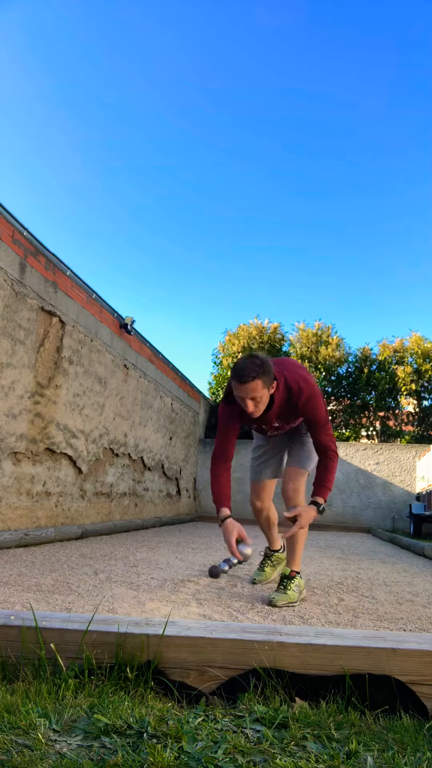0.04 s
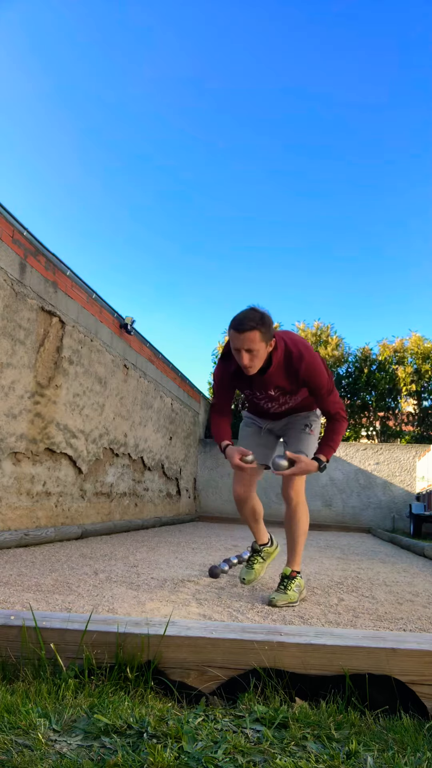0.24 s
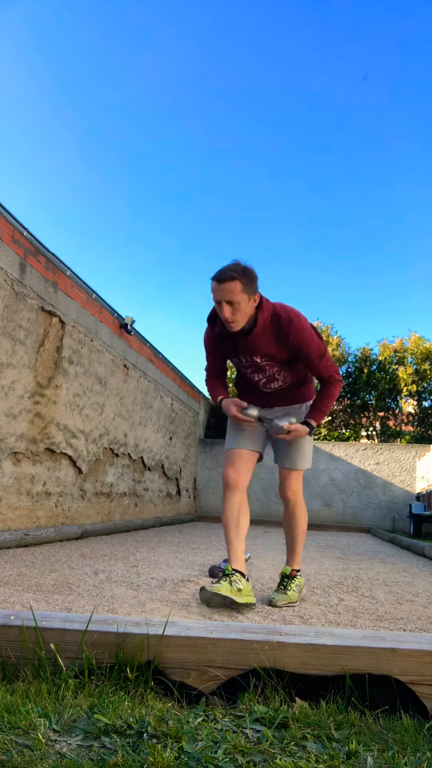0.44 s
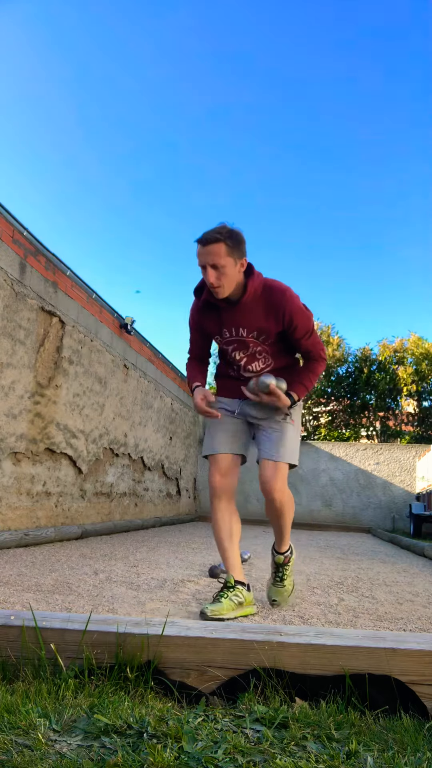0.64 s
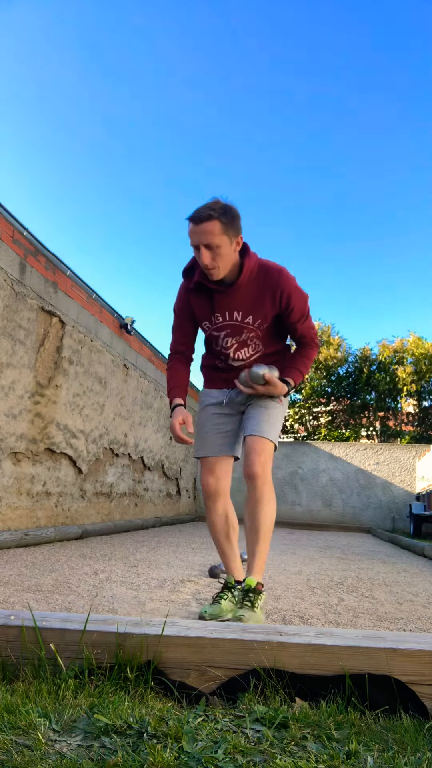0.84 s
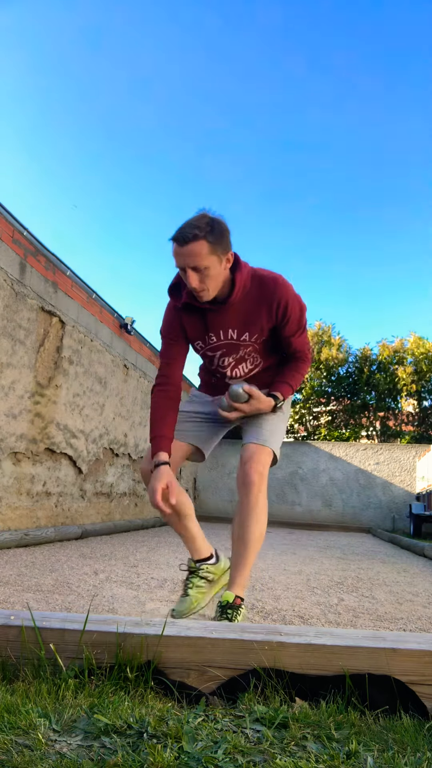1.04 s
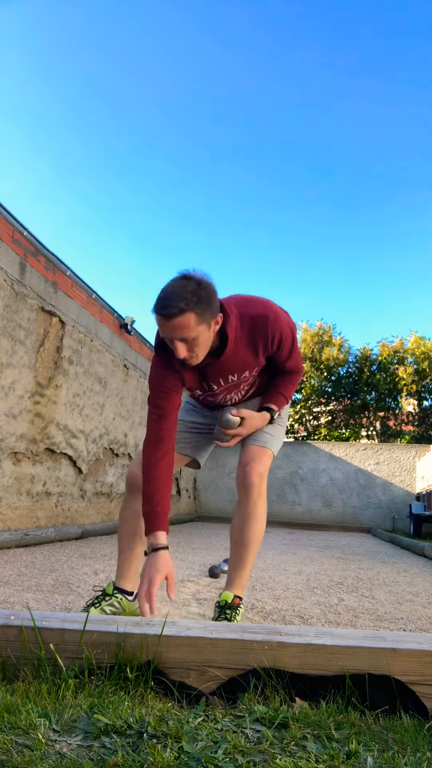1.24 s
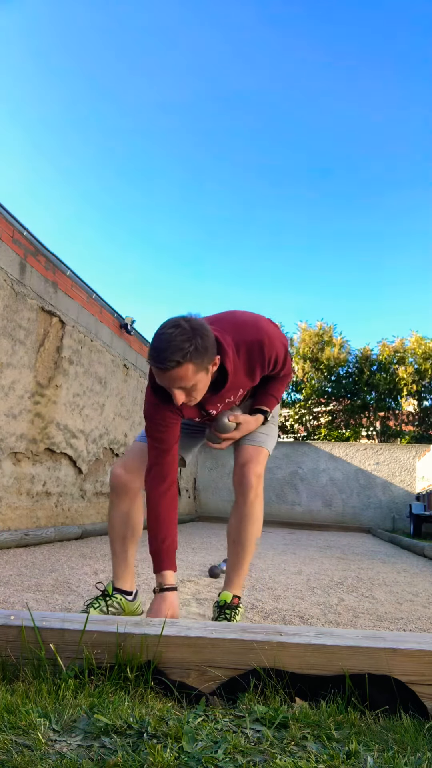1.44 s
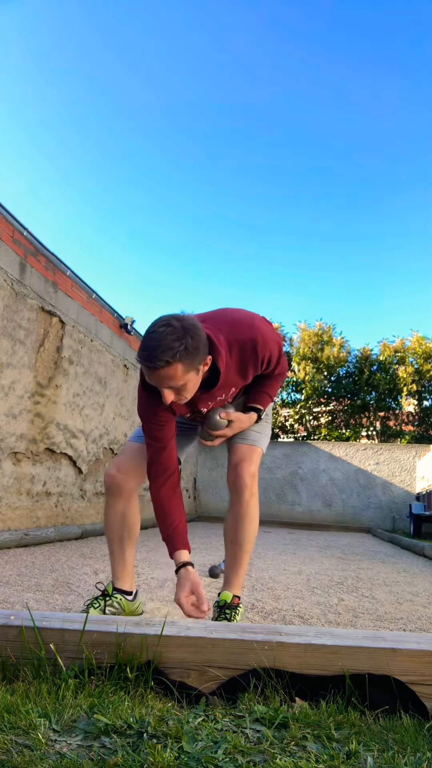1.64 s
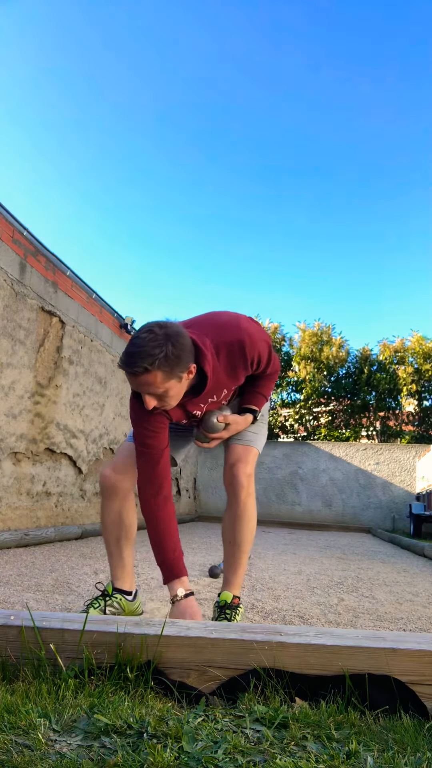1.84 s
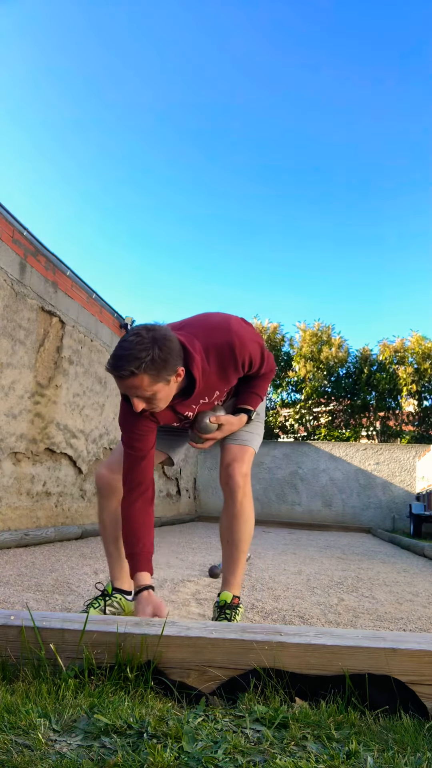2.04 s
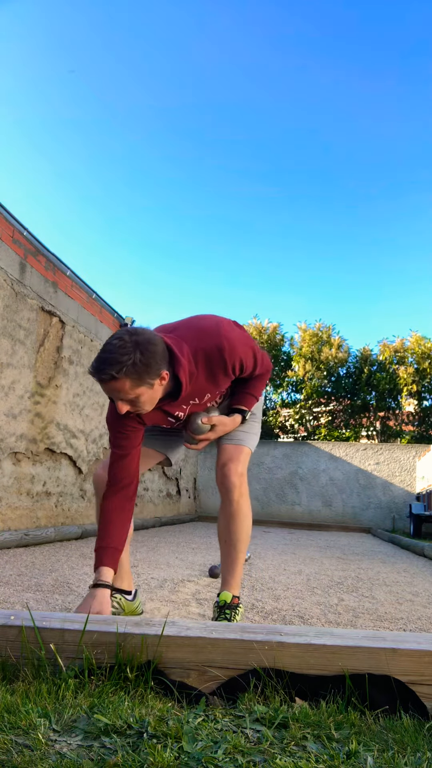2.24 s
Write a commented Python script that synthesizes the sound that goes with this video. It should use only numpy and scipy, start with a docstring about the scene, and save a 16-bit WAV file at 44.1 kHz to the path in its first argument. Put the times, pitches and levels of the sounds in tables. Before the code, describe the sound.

Solid steel balls clack together: one sharp hit, a small fading rattle, then a louder quickening run and a last soft one. Shoes crunch gravel between them; close microphone, walled outdoor court, light wind.

```python
"""Light wind rumbles over a quiet garden: coloured noise, with short band-passed bumps on the microphone.
Shoes and a hand crunch the gravel of a walled court: dense random clicks in three colours, swelling and dying.
From 0.23 s a player gathers steel boules: each clack rings a hollow and a shell, and the walls throw it back.
Larger stones knock from 0.49 s as short damped resonances; one thin noise tick falls at 1.05 s."""
import sys
import numpy as np
from scipy import signal
from scipy.fft import rfft, irfft
from scipy.io import wavfile

SR = 44100
rng = np.random.default_rng(int(sys.argv[2]) if len(sys.argv) > 2 else 0)


def generate_wav(sig):
    """Save sig (samples, or channels by samples) to the path in sys.argv[1] as 16-bit PCM at SR."""
    pcm = np.round(np.clip(np.atleast_2d(sig).T, -1, 1) * 32767).astype(np.int16)
    wavfile.write(sys.argv[1], SR, pcm)


N = 101429


def undb(db):
    """Decibels to amplitude gain."""
    return 10 ** (np.asarray(db) / 20)


def unit(x):
    """Scale to rms 1."""
    return x / np.sqrt(np.mean(x ** 2))


def band(f, hz, width_hz):
    """Response of one resonance, gain 1 at its centre."""
    return 1j * f * width_hz / (hz ** 2 - f ** 2 + 1j * f * width_hz)


def lowpass(f, hz):
    """Response of a two-pole low-pass."""
    return 1 / (1 - (f / hz) ** 2 + 1j * np.sqrt(2) * f / hz)


def colour(x, points):
    """Minimum-phase filter through (f/Hz, relative level/dB) points; the result has rms 1."""
    hz, db = np.array(points, float).T
    f = np.fft.rfftfreq(4096, 1 / SR)
    level_db = np.interp(np.log(f + 1), np.log(hz), db)
    cepstrum = irfft(np.log(undb(level_db)))
    # fold the cepstrum onto positive time: causal
    half = len(cepstrum) // 2
    cepstrum[1:half] *= 2
    cepstrum[half + 1:] = 0
    impulse = irfft(np.exp(rfft(cepstrum)))
    return unit(signal.fftconvolve(x, impulse)[:N])


def add(out, start_s, x):
    """Mix x in from a start time."""
    i = max(int(start_s * SR), 0)
    out[i:i + len(x)] += x[:max(len(out) - i, 0)]


def garden_hush():
    """Steady noise, strongest in the lows."""
    # garden colour: f/Hz, relative level/dB per Hz
    hush_colour = [(20, -25), (100, 4.5), (300, 0), (600, -4.5), (1300, -5.5), (2500, -12.5), (4000, -17.5),
                   (8000, -23.5), (16000, -37)]
    rms_db = -62
    return undb(rms_db) * colour(rng.standard_normal(N), hush_colour)


def wind(t):
    """Low noise rumble of varying level, plus bumps of air: band-passed noise under Gaussian windows."""
    # rumble level: t/s, level/dB
    rumble_level = [(0, -62), (.35, -60.5), (.48, -49.5), (.62, -63.5), (.92, -63.5), (1.2, -60.5),
                    (1.4, -58), (1.75, -56), (1.92, -56.5), (2.1, -61.5), (2.3, -54.5)]
    # rumble colour: f/Hz, relative level/dB per Hz
    rumble_colour = [(20, -30.5), (45, 2.5), (75, 1), (140, -4), (250, -6), (400, -36), (1000, -42.5)]
    # air bumps on the microphone: t/s, peak/dB, f/Hz, Gaussian half length/s
    bumps = [(0.174, -52.5, 76, 0.016), (0.529, -33.5, 83, 0.0088), (0.776, -35.5, 73.5, 0.012),
             (0.847, -41.5, 64.6, 0.015), (1.083, -50.5, 74, 0.022), (1.327, -44, 86, 0.01),
             (1.372, -34, 116, 0.008), (1.491, -38, 106.5, 0.013), (1.545, -42.5, 165, 0.0093),
             (1.602, -37, 90.8, 0.013), (1.664, -39.5, 109, 0.0056), (1.695, -37, 197, 0.0058),
             (1.737, -37.5, 120, 0.017), (1.809, -44, 107, 0.011), (1.992, -47.5, 240, 0.0078),
             (2.027, -48.5, 138, 0.015), (2.176, -45, 105, .012), (2.218, -40.5, 143, 0.0079),
             (2.251, -38, 106, 0.01)]
    width_ratio = 0.93  # width over centre of each of three cascaded bands
    times, levels_db = np.array(rumble_level).T
    out = undb(np.interp(t, times, levels_db)) * colour(rng.standard_normal(N), rumble_colour)
    f = np.fft.rfftfreq(N, 1 / SR)
    air = rfft(rng.standard_normal(N))
    for centre_s, peak_db, hz, half_s in bumps:
        bump = irfft(air * band(f, hz, width_ratio * hz) ** 3, N)
        bump *= np.exp(-.5 * ((t - centre_s) / half_s) ** 2)
        out += undb(peak_db) * bump / np.abs(bump).max()
    return out


def grains(per_s, spread_db):
    """Dense random clicks of either sign and uneven size."""
    hit = rng.random(N) < per_s / SR
    sign = rng.choice([-1, 1], N)
    size = undb(spread_db * np.minimum(rng.exponential(size=N), 4))
    return hit * sign * size


def swell(t, rise_s, fall_s):
    """Rise from 0 to 1, then die away exponentially."""
    return np.clip(t / rise_s, 0, 1) ** 0.41 * np.exp(-np.maximum(t - rise_s, 0) / fall_s)


def gravel(t):
    """Fine grit sprays at first touch; crunch and low weight swell together as the load comes on."""
    # shoe and finger scuffs: start/s, rise/s, fall/s, crunch/dB, weight/dB, grit/dB, grit fall/s
    scuffs = [(0.018, 0.047, 0.026, -59, -76, -75, 0.023),
              (0.453, 0.052, 0.058, -40.5, -49.5, -57.5, 0.041),
              (0.886, 0.037, 0.03, -35.5, -40.5, -58.5, 0.041), (0.961, 0.027, 0.046, -46, -63, -77, .03),
              (1.219, 0.022, 0.039, -44, -51, -63.5, 0.048), (1.264, 0.045, .012, -62, -55, -80.5, 0.037),
              (1.573, 0.0021, 0.0064, -71, -55.5, -92.5, 0.0051),
              (1.67, .012, 0.0061, -55.5, -51, -51.5, 0.014),
              (1.702, 0.0033, 0.024, -94, -56, -58.5, 0.0095),
              (1.791, 0.015, 0.0052, -55.5, -52.5, -62.5, 0.025),
              (1.865, 0.0072, .012, -56, -51.5, -61.5, 0.027),
              (1.93, .015, 0.012, -61.5, -56.5, -68, 0.088),
              (2.059, 0.046, 0.037, -68.5, -63.5, -76, 0.023), (2.138, 0.0059, .01, -61.5, -60, -71, 0.011)]
    # crunch colour: f/Hz, relative level/dB per Hz
    crunch_colour = [(200, -47), (600, -2.5), (1100, 1), (1600, -1), (2400, -6), (3500, -17), (5000, -28.5),
                     (8000, -38.5), (16000, -51)]
    # weight colour: f/Hz, relative level/dB per Hz
    weight_colour = [(60, -35), (180, -0.5), (350, 3.5), (650, -1), (1100, -23.5), (2000, -14.5),
                     (6000, -90)]
    # fine grit colour: f/Hz, relative level/dB per Hz
    grit_colour = [(800, 3), (2500, 4.5), (4500, 7), (8000, 0), (12000, 2.5), (16000, -1)]
    grains_per_s, spread_db, grit_rise_s = 5000, 3.8, 0.0047
    crunch = colour(grains(grains_per_s, spread_db), crunch_colour)
    weight = colour(grains(grains_per_s, spread_db), weight_colour)
    grit = colour(grains(grains_per_s, spread_db), grit_colour)
    out = np.zeros(N)
    for start_s, rise_s, fall_s, crunch_db, weight_db, grit_db, grit_fall_s in scuffs:
        stones = undb(crunch_db) * crunch + undb(weight_db) * weight
        out += swell(t - start_s, rise_s, fall_s) * stones
        out += swell(t - start_s, grit_rise_s, grit_fall_s) * undb(grit_db) * grit
    return out


def clack(pitch_hz, contact_hz):
    """One contact rings hollow and shell, duller and longer if gentle; returns (ahead, towards the walls)."""
    # hollow between balls and hand: multiple of its pitch, width/Hz, relative level/dB
    hollow_modes = [(.51, 110, -15), (.84, 250, -9), (1.02, 260, 5), (1.47, 119, -6), (1.63, 1000, -7),
                    (2.17, 120, -2), (3.01, 190, -6)]
    body_low_hz = 1800  # a ball this small radiates poorly below this
    swell_width_hz = 2700  # the hollow takes a cycle or so to build up
    full_shell_hz = 3570  # contact for full shell level; below, it weakens with the square of brightness
    snap_hz, snap_width_hz, snap_db = 15280, 11000, -7
    steel_hz, steel_width_hz, steel_db = 10760, 1600, 4.5
    open_hz, open_width_hz, open_db = 2600, 2060, -6.5  # broader sound leaving the hands

    f = np.fft.rfftfreq(2048, 1 / SR)
    push = lowpass(f, contact_hz) ** 2 * 1j * f / (body_low_hz + 1j * f)
    hollow = sum(undb(db) * band(f, ratio * pitch_hz, width_hz) for ratio, width_hz, db in hollow_modes)
    hollow = hollow * lowpass(f, 2.3 * contact_hz)
    snap = undb(snap_db) * band(f, snap_hz, snap_width_hz)
    steel = snap - undb(steel_db) * band(f, steel_hz, steel_width_hz)
    shell = steel * (contact_hz / full_shell_hz) ** 2
    build_up = 1 - 2 * band(f, pitch_hz, swell_width_hz)  # all-pass
    ahead = irfft(push * build_up * (hollow + shell))
    opening = undb(open_db) * band(f, open_hz, open_width_hz)
    around = irfft(push * opening * lowpass(f, 7500))
    return np.array([ahead, around]) / np.abs(ahead).max()


def scatter(x, db, t60_s):
    """Tail of random scattered reflections, quick to build and dying exponentially."""
    reflections_per_s, build_s = 750, .006
    t = np.arange(N) / SR
    decay = np.exp(-np.log(1000) * t / t60_s)
    tail = grains(reflections_per_s, spread_db=-0.5) * decay * (1 - np.exp(-t / build_s))
    tail /= np.sqrt(np.sum(tail ** 2))
    return undb(db) * signal.fftconvolve(x, tail)[:N]


def crossover(kind):
    """One side of the steep split between the tail's body and its treble."""
    return signal.butter(6, 2590, kind, fs=SR, output="sos")


def boules():
    """The clacks, their slaps off the walls and the court's tail, whose treble dies first."""
    # boule on boule: t/s, peak/dB, hollow pitch f/Hz, contact brightness f/Hz, near-wall echo/dB
    clacks = [(0.2296, -3.5, 2300, 3430, -11.5), (0.3883, -17.5, 1950, 2010, -11),
              (.4100, -22, 1860, 1970, -6), (0.428, -28.5, 1740, 1928, -15), (.4400, -28, 1760, 1770, -20),
              (.4492, -31, 1700, 1780, -2), (0.4562, -35.5, 1740, 1770, -2),
              (0.6059, -8.5, 1773, 3270, -13), (0.6372, -8.5, 1665, 2730, -28),
              (.6799, -12, 1634, 2540, -42), (.7120, -14.5, 1650, 2530, -27),
              (.7406, -17.5, 1650, 2470, -41), (0.7635, -22, 1630, 2320, -31),
              (.7822, -22.5, 1590, 2220, -36), (0.797, -43.5, 1470, 2240, -35),
              (0.8106, -28.5, 1574, 2080, -27), (.8211, -29, 1570, 2000, -29),
              (0.8314, -34, 1580, 1850, -25), (0.8797, -24, 1894, 2670, -29),
              (.9660, -19.5, 1585, 1690, -15), (0.9889, -25.5, 1500, 1570, -29),
              (1, -30.5, 1480, 1650, -19), (1.0075, -37, 1620, 1590, -9)]
    # farther walls: delay/s, level/dB
    echoes = [(.0268, -15), (.0319, -24), (.0338, -33), (.0403, -18.5), (.0463, -24), (.073, -26),
              (.089, -40), (.1355, -30)]
    near_wall_s = .0087
    direct, outward, slap = np.zeros((3, N))
    for start_s, peak_db, pitch_hz, contact_hz, wall_db in clacks:
        ahead, around = undb(peak_db) * clack(pitch_hz, contact_hz)
        add(direct, start_s, ahead)
        add(outward, start_s, around + undb(-6) * ahead)
        add(slap, start_s + near_wall_s, undb(wall_db) * ahead)
    for delay_s, db in echoes:
        add(slap, delay_s, undb(db) * outward)
    low = signal.sosfilt(crossover("low"), outward)
    high = signal.sosfilt(crossover("high"), outward)
    tail = scatter(low, db=-8.5, t60_s=.6) + scatter(high, db=-12, t60_s=.27)
    return direct + slap + tail


def knocks():
    """Larger stones shift under shoe and hand, each a short damped knock."""
    # stones and dull knocks: t/s, peak/dB, f/Hz, width of each of three cascaded bands/Hz
    stones = [(0.4915, -40, 1700, 1300), (0.5204, -29.5, 2000, 1150), (0.8962, -33, 1270, 1180),
              (0.915, -30, 900, 1100), (1.24, -33.5, 1480, 1830), (1.718, -50, 3900, 3000),
              (1.577, -49, 800, 910), (1.687, -44.5, 293, 248), (1.800, -41.5, 370, 200),
              (1.8743, -45, 1450, 696), (1.873, -46, 420, 250)]
    out = np.zeros(N)
    f = np.fft.rfftfreq(4096, 1 / SR)
    for start_s, peak_db, hz, width_hz in stones:
        knock = irfft(band(f, hz, width_hz) ** 3)
        add(out, start_s, undb(peak_db) * knock / np.abs(knock).max())
    return out


def tick(t):
    """One thin, bright tick: coloured noise with a fast rise and exponential fall."""
    # tick colour: f/Hz, relative level/dB per Hz
    tick_colour = [(1000, -25), (2500, -23), (3500, -3.5), (5500, -7), (8000, -11), (10500, -3),
                   (13000, -14), (16000, -23)]
    start_s, rise_s, fall_s, level_db = 1.0518, 0.00036, 0.0017, -39
    noise = colour(rng.standard_normal(N), tick_colour)
    return undb(level_db) * swell(t - start_s, rise_s, fall_s) * noise


def scene():
    """Garden hush, wind, gravel, boules, knocks and tick, summed to one channel."""
    t = np.arange(N) / SR
    return (garden_hush() + wind(t) + gravel(t) + boules() + knocks() + tick(t))[None]


def record(dry):
    """The recorder cuts the top: steep elliptic low-pass."""
    top_hz, ripple_db, stop_db = 16100, .2, 70
    return signal.sosfilt(signal.ellip(8, ripple_db, stop_db, top_hz, fs=SR, output="sos"), dry)


dry = scene()
out = record(dry)
generate_wav(out)
```